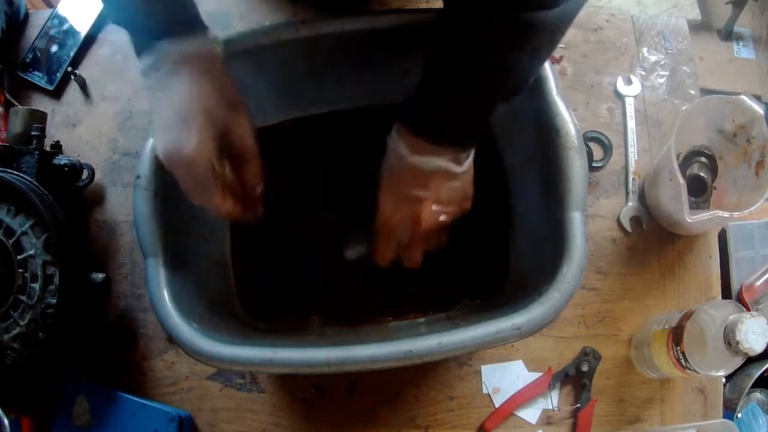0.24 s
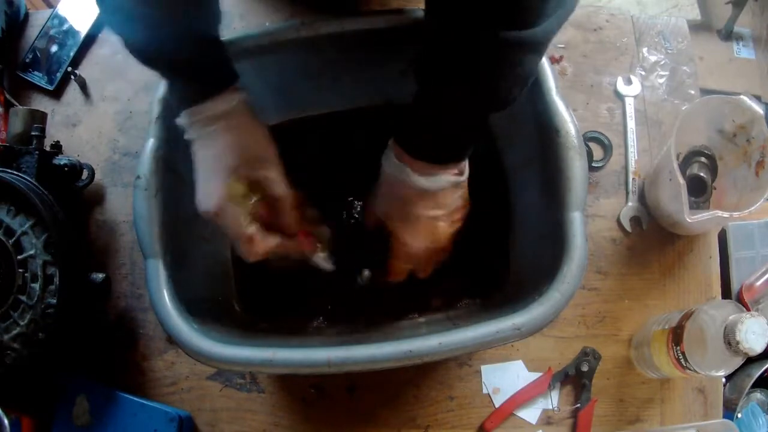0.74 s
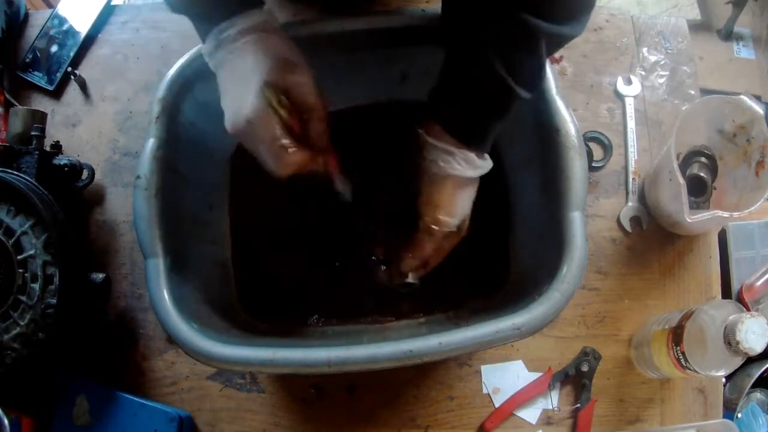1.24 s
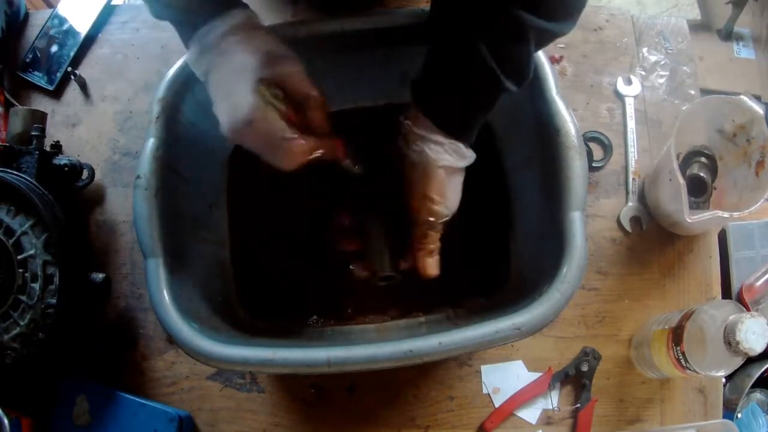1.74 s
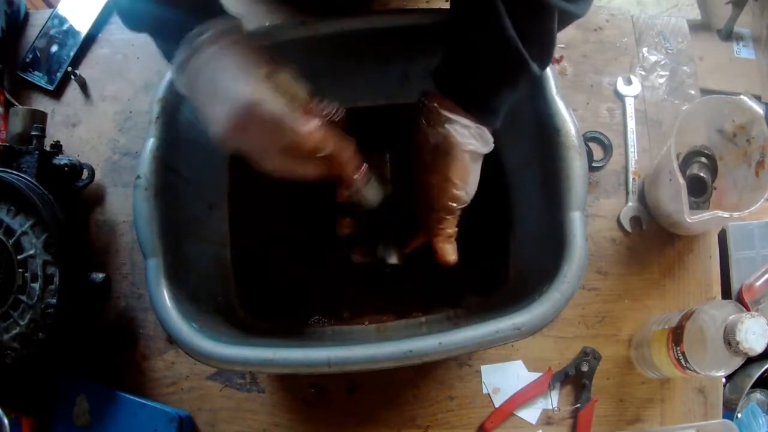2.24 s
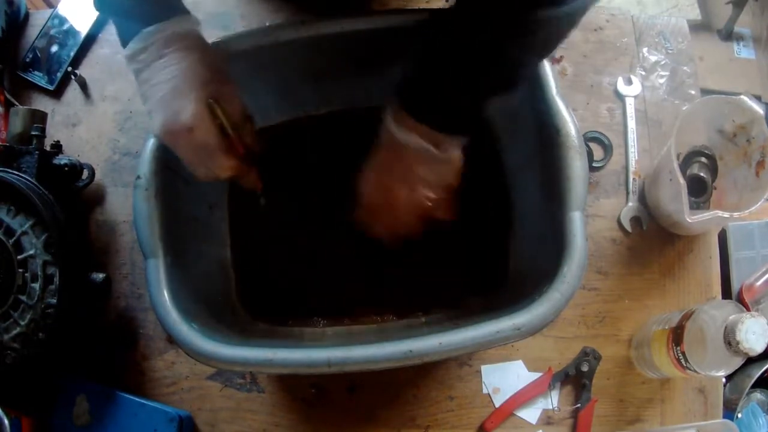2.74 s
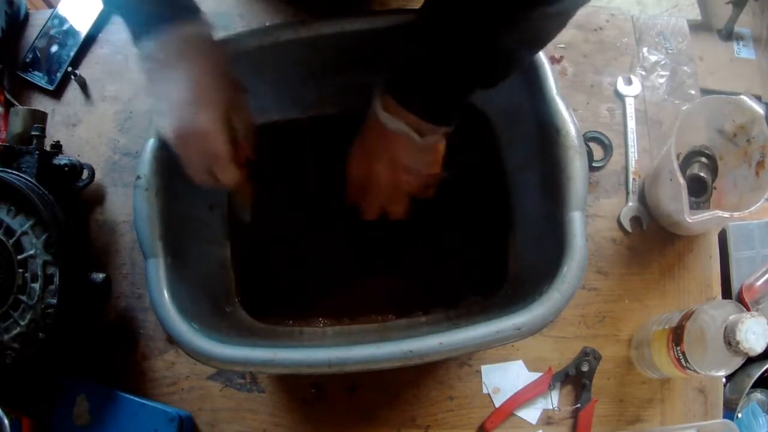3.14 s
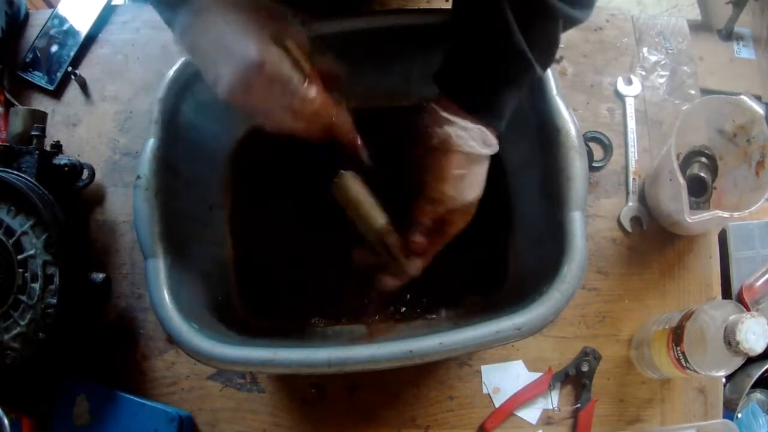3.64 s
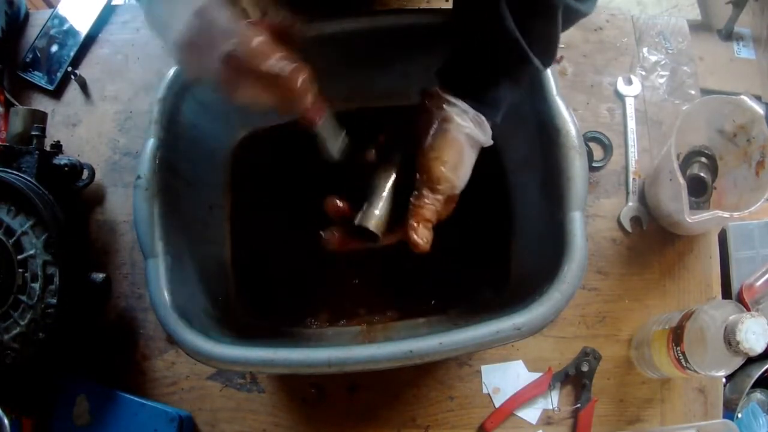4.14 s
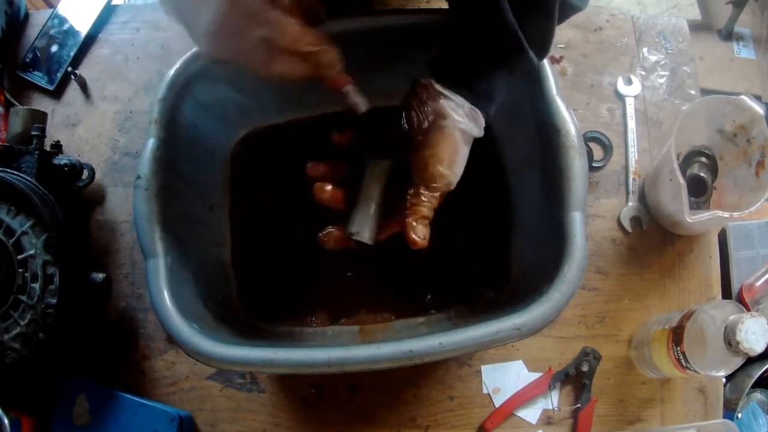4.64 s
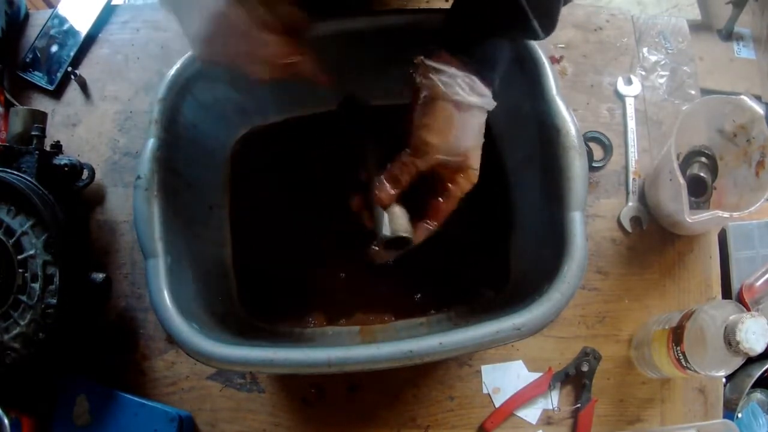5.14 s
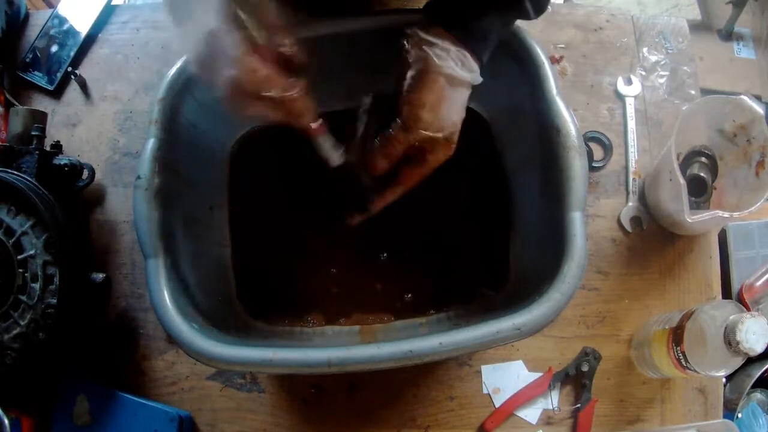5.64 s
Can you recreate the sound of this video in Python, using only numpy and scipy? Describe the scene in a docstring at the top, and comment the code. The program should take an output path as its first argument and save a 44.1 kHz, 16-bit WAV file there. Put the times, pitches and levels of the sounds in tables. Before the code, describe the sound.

A small wet brush scrubs a hand-muffled metal tube over a bowl of solvent, strokes short, raspy and irregular. Near the beginning and again around the middle, the tube is plunged in, knocking the plastic sharply and grinding over its gritty bottom. Bubbles tick, liquid fizzes and faint clinks ring. The microphone is close; steady soft room noise, low hum and flickering high hiss lie behind.

```python
"""At a workshop bench, a steel tube is washed in a plastic bowl of solvent, close to the microphone.
Twice it is plunged in: each knock is noise and damped modes of the bowl, softened by its contact time.
It is then dragged, juddering, over the gritty bottom: bursts of jerks through the bowl, plus gritty clicks.
A small wet brush (shaped clicks) scrubs in uneven strokes, four or five a second, around the plunges.
Decaying sines make drops and steel clinks; the solvent fizzes, the workshop hums, the recorder hisses."""
import sys
import numpy as np
from scipy import signal
from scipy.fft import rfft, irfft
from scipy.io import wavfile
from scipy.ndimage import uniform_filter1d

SR = 44100
rng = np.random.default_rng(int(sys.argv[2]) if len(sys.argv) > 2 else 0)


def store_wav(level_fs):
    """Save 16-bit WAV to argv[1]."""
    pcm = np.round(np.clip(np.atleast_2d(level_fs), -1, 1) * 32767)
    wavfile.write(sys.argv[1], SR, pcm.T.astype(np.int16))


N = 259293
T = np.arange(N) / SR  # time [s]

# workshop air: (frequency [Hz], relative level [dB per Hz])
SHOP_COLOUR = [(15, -40.5), (25, -4.5), (43, -8.5), (86, -1), (164, -7.5), (305, -4), (598, -9.5),
               (970, -4), (1170, -10), (1410, -14), (3170, -23.5), (5430, -26.5), (9050, -32), (13900, -26),
               (15500, -24.5)]
# faint high hiss of the recorder: (frequency [Hz], gain [dB])
RECORDER_HISS_COLOUR = [(2000, -32.0), (7000, -4.5), (11000, -4.5), (14000, 1.5), (16000, -6)]

# fizzing of the stirred solvent: (time [s], level [dB], half length [s])
FROTH = [(.45, -55, 0.11), (.8, -54.5, .12), (2.972, -50, 0.21), (3.27, -54, .1)]
# fine crackle within the fizz: (frequency [Hz], gain [dB])
CRACKLE_COLOUR = [(1000, -21), (4000, 4.5), (8000, -6), (11000, -2.0), (15000, -4.5)]

# bubbles and drops: (time [s], starting pitch [Hz], peak level [dB], t60 [s])
DROPS = [(.055, 543, -44, 0.061), (.095, 3740, -51, 0.04), (1.217, 5450, -34, 0.027),
         (1.224, 5540, -30, .025), (2.213, 5040, -46, .024), (2.217, 4270, -44.5, .024),
         (2.895, 6680, -33.5, 0.057), (2.901, 7040, -34, 0.046), (3.474, 5450, -42.5, .03),
         (3.577, 4080, -46.5, 0.045), (5.525, 5130, -43, 0.045)]

# sharp contacts that ring the steel: (time [s], relative level [dB])
CLINKS = [(0.3315, -32), (0.913, -40), (2.678, -14), (2.6812, -20.5), (2.785, -50), (2.823, -38),
          (2.858, -25), (3.003, -25), (3.185, -34), (3.748, -41), (4.366, -33), (4.951, -40.5),
          (5.164, -46)]
# steel tube muffled by hand and liquid: (nominal frequency [Hz], relative level [dB], t60 [s])
TUBE_MODES = [(1517, -10.5, .05), (2660, -12.5, 0.032), (2900, -13, 0.046), (3870, -16, 0.051),
              (4730, -2, 0.036), (5336, 1, 0.041), (5640, 0.5, 0.028), (10500, -12, 0.031)]
# the tick at each clink: (frequency [Hz], gain [dB])
TICK_COLOUR = [(200, -30.0), (1500, 14.0), (6000, 3), (8000, -13.5), (15000, -16.5)]

# brush strokes: (time [s], hiss level [dB], half length [s], relative squelch level [dB])
STROKES = [(0.07, -64, 0.039, -49.5), (0.36, -43.5, .015, -52), (0.552, -52, 0.022, -37.5),
           (0.904, -56, 0.044, -48.5), (1.007, -63, 0.032, -52), (1.234, -43.5, .045, -46.5),
           (1.518, -53.5, 0.062, -54), (1.777, -50, 0.056, -55.5), (2.014, -60, .03, -63),
           (2.094, -51, 0.042, -59), (2.212, -59.5, 0.024, -60), (2.411, -48.5, 0.059, -54.5),
           (3.487, -53.5, 0.054, -53), (3.665, -63, 0.043, -58), (3.749, -47, 0.017, -48),
           (3.884, -53, 0.012, -42.5), (4.008, -63, 0.021, -73), (4.105, -58, 0.052, -59),
           (4.384, -56.5, 0.061, -53.5), (4.657, -58, 0.063, -55.5), (4.954, -53.5, 0.032, -55),
           (5.171, -49.5, 0.022, -50), (5.347, -54.5, 0.047, -54), (5.525, -54.5, 0.061, -55.5),
           (5.78, -61.5, 0.17, -61.5)]
# brush hiss: (frequency [Hz], relative level [dB per Hz])
BRUSH_COLOUR = [(290, -42), (500, -6), (769, 7.5), (1220, -0.5), (1510, -2.5), (1820, 3.5), (2100, -8.5),
                (3680, -9), (4020, -3.5), (4840, -5.5), (5430, -1), (7670, -3), (11600, -8), (14200, -18),
                (15500, -25)]
# extra tone on the bristles: (frequency [Hz], gain [dB])
BRISTLE_TONE = [(300, -6), (1200, -6), (2500, 4.0), (5000, 1), (8000, -8.5), (11000, 2.5), (15000, 5.5)]
# squelch of the soaked tuft: (frequency [Hz], gain [dB])
TUFT_COLOUR = [(150, -16.5), (450, 4.0), (1150, -4.0), (1500, 4), (1950, -0.5), (2600, -5),
               (4700, -14.5), (5400, -3.0), (6500, -25), (8000, -16.0), (15000, -29.5)]
# after each stroke the brush slides back with a soft squelch
RETURN_LAG_S, RETURN_HALF_S, RETURN_DB = 0.092, .05, -62.5

# drags over the bottom: (start [s], end [s], attack [s], release [s], relative level [dB],
# grit level [dB], easing [dB per s], judder [Hz])
DRAGS = [(.43, .48, 0.013, 0.031, -27.5, -44, 142, 24), (0.6, 0.628, 0.032, 0.025, -21, -43.5, 70, 46.36),
         (.71, 0.745, 0.041, 0.018, -39, -47, 5, 27.9), (0.803, 0.85, 0.029, 0.032, -34.5, -47, 130, 36.12),
         (2.792, 3.041, 0.036, 0.023, -15.5, -34, 17.5, 29.05),
         (3.193, 3.357, 0.043, 0.012, -24, -40, 18.5, 27.53)]
# crunching grit: (frequency [Hz], relative level [dB per Hz])
GRIT_COLOUR = [(1290, -4), (2200, -0.5), (3100, -4), (4200, -4), (6210, -15), (6850, -14.5), (9190, -27),
               (10100, -15.5), (13900, -31.5), (15500, -45)]
# tone of the dragged bowl: (frequency [Hz], gain [dB])
DRAG_COLOUR = [(60, -43), (130, -7.5), (210, 1), (450, 0), (750, 0.5), (1900, -1.0), (3000, -5.5), (6000, -8.5)]
SLIP_HALF_S, GRIT_JUDDER_DB = .0125, 1.5  # half length of one slip; swing of the grit with each slip

# the tube strikes the bowl: (time [s], relative level [dB], contact time of the first touch [ms])
KNOCKS = [(.3298, -4.5, 0.13), (.356, -2.5, 0.32), (0.3679, -11.5, .7), (.388, -13.5, 1), (.42, -21, 0.2),
          (.738, -28, 0.66), (2.6685, -4.5, 0.14), (2.6765, 0, 0.44), (2.68, -1, 0.034), (2.7047, -9, 1),
          (2.8166, -10, 0.061), (2.826, -13, 0.077), (2.852, -18.5, 0.36), (2.889, -14.5, .7),
          (2.973, -10.5, .44), (3.147, -26, .5), (3.226, -21, 0.26)]
# what the bowl rings with: (frequency [Hz], relative level [dB], t60 before damping [s])
BOWL_MODES = [(106, -12.5, 0.25), (138.3, -17, .22), (217.2, -10, .22), (329, -6.5, .24), (420.8, 1, 0.21),
              (486.8, -1, 0.25), (560, -15.5, 0.2), (700, -9, 0.24), (762, 7.5, 0.14), (837, 4, 0.086),
              (832, -13.5, 0.33), (1003, -3, .12), (1138, -4.5, 0.087), (1380, 4.5, 0.057),
              (1500, 3.5, 0.05), (1680, -14.5, 0.13), (1818, -8.5, 0.078)]
# the bowl's dense, quickly damped vibration: (frequency [Hz], relative level [dB per Hz])
BOWL_COLOUR = [(40, -28.5), (130, -16.5), (250, -11), (450, -5), (800, -1.5), (1230, -9.5), (1500, -4),
               (1900, -6.5), (2400, -16), (4000, -18), (5500, -22.5), (7000, -31.5), (11000, -33),
               (16000, -37)]
# after each blow the tube chatters on the plastic, each touch weaker and softer than the last
CHATTER_GAP_S, CHATTER_LOSS_DB, CHATTER_SOFTENING = .0048, 7, 2.6


def undb(db):
    """Decibels to gain."""
    return 10 ** (np.asarray(db) / 20)


def unit(x):
    """Scale to rms 1."""
    return x / np.sqrt(np.mean(x ** 2))


def fade(t, t60):
    """Exponential decay, 60 dB down at t60."""
    return np.exp(-np.log(1000) * t / t60)


def add(out, s, x):
    """Mix x into out from time s."""
    i = int(s * SR)
    out[i:i + len(x)] += x[:N - i]


def ring(x, response):
    """Play x through an impulse response."""
    return signal.fftconvolve(x, response)[:len(x)]


def colour(x, points):
    """Causal filter with a (Hz, dB) spectrum, from the cepstrum of its log gain."""
    hz, db = np.transpose(points)
    size = 4096
    bins = np.fft.rfftfreq(size, 1 / SR)
    gain_db = np.interp(np.log(bins + 1), np.log(hz), db)
    cepstrum = irfft(np.log(undb(gain_db)))
    # fold the cepstrum forward in time: minimum phase
    cepstrum[1:size // 2] *= 2
    cepstrum[size // 2 + 1:] = 0
    return ring(x, irfft(np.exp(rfft(cepstrum))))


def walk(rate):
    """Smooth chance of spread 1 that changes rate times a second."""
    return unit(np.interp(T * rate, np.arange(N), rng.standard_normal(N)))


def clicks(rate, spread_db, size=N):
    """Random tiny impacts, rate a second, of scattered size."""
    hits = rng.random(size) < rate / SR
    signs = rng.choice([-1, 1], size)
    return hits * signs * undb(spread_db * np.minimum(rng.standard_normal(size), 2))


def steady(x):
    """Hold the 40 ms level at 1 and keep the faster grain."""
    return x / np.sqrt(np.abs(uniform_filter1d(x ** 2, size=1764)) + 1e-12)


def swell(s, db, half_length):
    """A bell-shaped rise and fall of level around time s."""
    return undb(db) * np.exp(-np.minimum(np.abs(T - s) / half_length, 10) ** 2)


def room(x, wet_db=-11, t60=0.17):
    """Bench and near walls return a short tail."""
    t = T[:SR // 2]
    tail = rng.standard_normal(len(t)) * fade(t, t60) * (t > .003)
    return x + undb(wet_db) * ring(x, tail / np.linalg.norm(tail))


def recorder_hiss(level_db=-67):
    """Faint high hiss of the recorder, flickering 30 times a second."""
    flicker = np.cos(np.pi * 30.3 * T) ** 4
    hiss = colour(rng.standard_normal(N), RECORDER_HISS_COLOUR) * flicker
    return undb(level_db) * unit(hiss)


def workshop(air_db=-56, hum_hz=95, hum_db=-65.0):
    """Near-steady room noise and a low hum that wavers in pitch and level."""
    air = unit(colour(rng.standard_normal(N), SHOP_COLOUR)) * undb(air_db + .3 * walk(5))
    wavering_hz = hum_hz * (1 + .03 * walk(20))
    hum = np.sin(2 * np.pi * np.cumsum(wavering_hz) / SR) * undb(2.3 * walk(12))
    return air + undb(hum_db) * unit(hum)


def froth(count=2500, t60=.012, size_range_db=6):
    """Fizzing hiss of the stirred solvent: a fine crackle with a dense, faintly tonal high shimmer."""
    shimmer, t = np.zeros(N), T[:SR // 40]
    for when, pitch, size in rng.random((count, 3)):
        hz = 3500 + 11000 * pitch
        grain = fade(t, t60) * np.sin(2 * np.pi * hz * t)
        add(shimmer, when * T[-1], undb(size_range_db * size) * grain)
    crackle = colour(clicks(rate=3600, spread_db=2), CRACKLE_COLOUR)
    fizz = steady(shimmer) + steady(crackle)
    return unit(fizz) * sum(swell(*spell) for spell in FROTH)


def drops(glide=0.64):
    """Small bubbles ring and rise in pitch as they reach the surface."""
    out, t = np.zeros(N), T[:SR // 8]
    for s, hz, db, t60 in DROPS:
        rising = np.sin(2 * np.pi * hz * t * (1 + glide * t))
        add(out, s, undb(db) * fade(t, t60) * rising)
    return out


def clinks(gain_db=-6, tick_db=-5, tick_t60=0.041):
    """Grit or the brush's hard head catches the tube: a tick and a short metallic ring."""
    out, t = np.zeros(N), T[:SR // 8]
    for s, db in CLINKS:
        # each mode is slightly detuned by the grip
        grip = 1 + .008 * rng.standard_normal(len(TUBE_MODES))
        steel = np.zeros(len(t))
        for (hz, mode_db, t60), detune in zip(TUBE_MODES, grip):
            steel += undb(mode_db) * fade(t, t60) * np.sin(2 * np.pi * hz * detune * t)
        tick = colour(rng.standard_normal(len(t)) * fade(t, tick_t60), TICK_COLOUR)
        add(out, s, undb(db + gain_db) * (steel + undb(tick_db) * tick))
    return out


def brush(squelch_db=-2, rest_db=-71, tube_hz=1460, tube_t60=0.018, tube_db=-3):
    """Wet bristles flick off the steel in bunches; the soaked tuft squelches and wakes the tube's hollow note."""
    flicks = clicks(rate=8000, spread_db=3) * undb(1.7 * walk(130))
    bristles = colour(colour(flicks, BRUSH_COLOUR), BRISTLE_TONE)
    pops = clicks(rate=2400, spread_db=4) * undb(2.2 * walk(70))
    tuft = unit(colour(pops, TUFT_COLOUR))
    t = T[:SR // 8]
    hollow = unit(ring(pops, fade(t, tube_t60) * np.sin(2 * np.pi * tube_hz * t)))
    hiss, squelch = np.full(N, undb(rest_db)), np.zeros(N)
    for s, stroke_db, half_length, wet_db in STROKES:
        hiss += swell(s, stroke_db, half_length)
        squelch += swell(s, wet_db + squelch_db, half_length)
        squelch += swell(s + RETURN_LAG_S, RETURN_DB, RETURN_HALF_S)
    return steady(bristles) * hiss + steady(tuft + undb(tube_db) * hollow) * squelch


def bowl(thud_t60, tail_db, tail_t60, modes_db, damping, spot_db):
    """The bowl's answer to one blow: a dense thud, a short tail and its modes, weighted by the spot that is hit."""
    t = T[:SR // 3]
    decay = fade(t, thud_t60) + undb(tail_db) * fade(t, tail_t60)
    dense = unit(colour(rng.standard_normal(len(t)) * decay, BOWL_COLOUR))
    spot = undb(spot_db * rng.standard_normal(len(BOWL_MODES)))
    modes = np.zeros(len(t))
    for k, (hz, db, t60) in enumerate(BOWL_MODES):
        sign = (-1) ** k
        modes += sign * spot[k] * undb(db) * fade(t, t60 / damping) * np.sin(2 * np.pi * hz * t)
    # a bowl this small radiates no deep bass
    high_pass = signal.butter(4, 80, "high", fs=SR, output="sos")
    return unit(signal.sosfilt(high_pass, dense + undb(modes_db) * unit(modes)))


def pressure(t, start, end, attack, release, easing):
    """The hand bears down by start, eases off steadily and lets go at end."""
    outside = np.maximum(start - t, 0) / attack + np.maximum(t - end, 0) / release
    eased_db = -easing * (np.clip(t, start, end) - start)
    return np.exp(-np.minimum(outside, 10) ** 2) * undb(eased_db)


def slip():
    """One slip: a run of tiny jerks at a new spot of the bowl, damped by the hand."""
    t = T[:SR // 2]
    push = np.exp(-(t / SLIP_HALF_S - 2) ** 2)
    jerks = clicks(rate=1000, spread_db=3, size=len(t)) * push
    response = bowl(thud_t60=0.038, tail_db=-11.5, tail_t60=0.29, modes_db=-1, damping=2.2, spot_db=1.5)
    sound = ring(jerks, response)
    return sound * np.linalg.norm(push) / np.linalg.norm(sound)


def drags(count=11):
    """The dragged tube sticks and slips in a steady judder; grit crunches under it with each slip."""
    body, load = np.zeros(N), np.zeros(N)
    for start, end, attack, release, db, crunch_db, easing, judder_hz in DRAGS:
        hand = (start, end, attack, release, easing)
        # the first slip comes one judder ahead of the start
        for s in start + (np.arange(count) - 1) / judder_hz:
            add(body, s - 2 * SLIP_HALF_S - .004, undb(db) * pressure(s, *hand) * slip())
        judder = np.cos(2 * np.pi * judder_hz * (T - start))
        load += undb(crunch_db + GRIT_JUDDER_DB * judder) * pressure(T, *hand)
    crunch = clicks(rate=4000, spread_db=4.5)
    grit = steady(colour(crunch, GRIT_COLOUR)) * load
    return colour(body, DRAG_COLOUR) + room(grit)


def knocks(gain_db=-19.5, count=3):
    """The tube lands and chatters; a longer contact gives a duller blow."""
    out = np.zeros(N)
    for s, db, contact_ms in KNOCKS:
        for touch in range(count):
            contact_s = contact_ms / 1000 * CHATTER_SOFTENING ** touch
            keep = np.exp(-2 / (contact_s * SR))  # one-pole low-pass
            blow = bowl(thud_t60=0.034, tail_db=-16.0, tail_t60=0.23, modes_db=-4.5, damping=0.81, spot_db=-0.5)
            softened = unit(signal.lfilter([1 - keep], [1, -keep], blow))
            touch_db = db + gain_db - touch * CHATTER_LOSS_DB
            add(out, s + touch * CHATTER_GAP_S, undb(touch_db) * softened)
    return out


def scene():
    """All sources at the one microphone, with the recorder's hiss."""
    washing = room(froth() + drops() + clinks() + brush())
    return (recorder_hiss() + workshop() + washing + drags() + knocks())[None]


def record(dry, top_hz=15300):
    """The recorder rounds the loudest peaks and cuts the top."""
    low_pass = signal.ellip(12, .2, 90, top_hz, fs=SR, output="sos")
    return signal.sosfilt(low_pass, np.tanh(dry))


dry = scene()
out = record(dry)
store_wav(out)
```